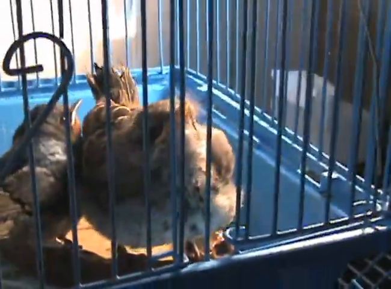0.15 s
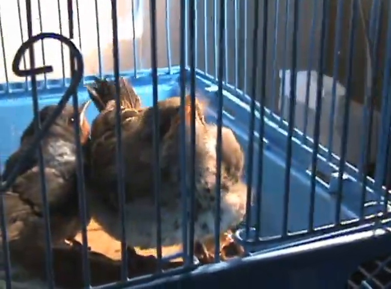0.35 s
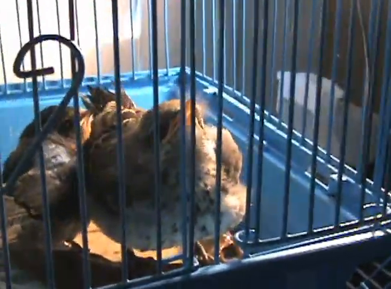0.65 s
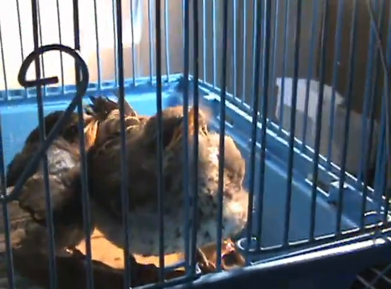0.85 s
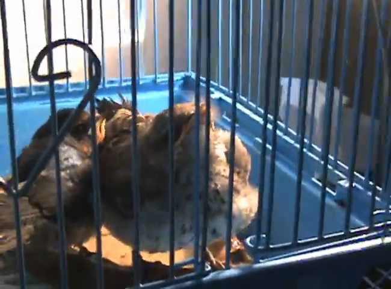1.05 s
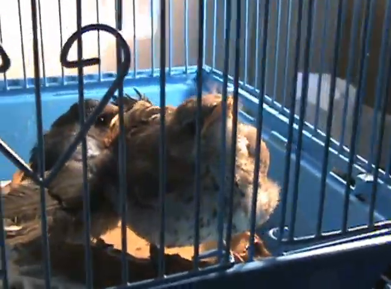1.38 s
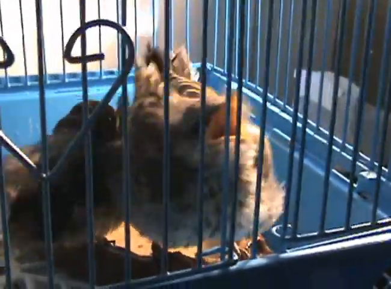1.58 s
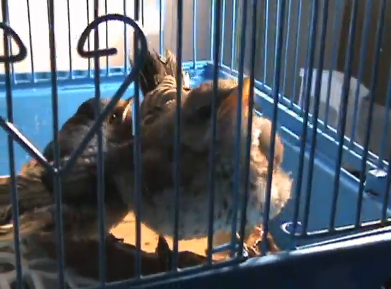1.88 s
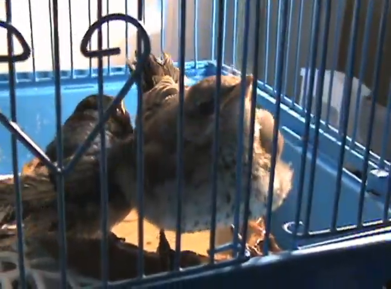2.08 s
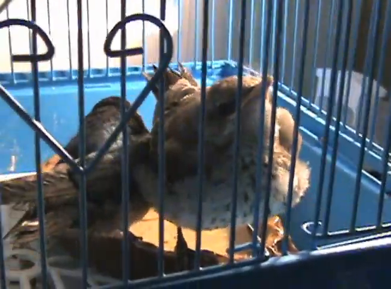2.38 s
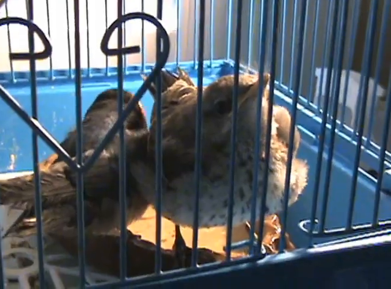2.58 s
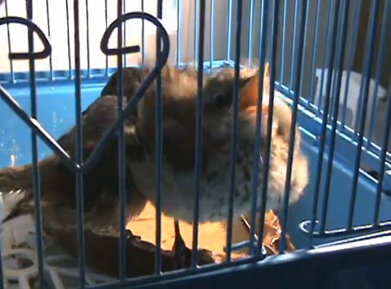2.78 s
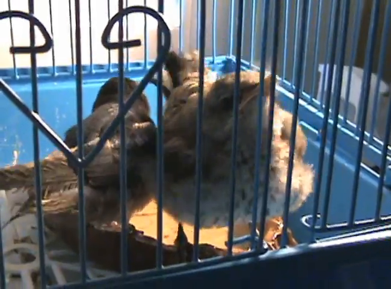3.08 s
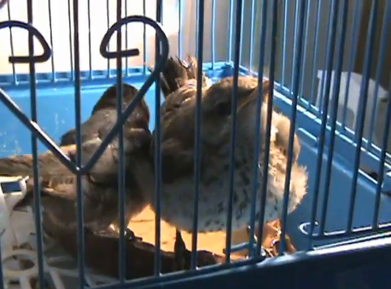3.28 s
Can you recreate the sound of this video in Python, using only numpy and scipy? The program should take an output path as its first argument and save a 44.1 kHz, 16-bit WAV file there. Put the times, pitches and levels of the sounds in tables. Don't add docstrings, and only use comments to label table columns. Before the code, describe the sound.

Two short, shrill chick whistles, over a second apart, with faint rustling and low room hum.

```python
import sys
import numpy as np
from scipy import signal
from scipy.fft import rfft, irfft, next_fast_len
from scipy.io import wavfile
from scipy.ndimage import uniform_filter1d, minimum_filter1d, map_coordinates

SR = 44100
rng = np.random.default_rng(int(sys.argv[2]) if len(sys.argv) > 2 else 0)


def transcribe(u):
    v = np.clip(np.atleast_2d(u).T, -1, 1)
    q = np.round(v * 32767).astype(np.int16)
    wavfile.write(sys.argv[1], SR, q)


def volts_from_decibels(level):
    exponent = np.asarray(level, float) / 20
    return 10 ** exponent


N = 152145


def unit(x):
    return x / np.sqrt(np.mean(x ** 2) + 1e-20)


def along(points, hz):
    point_hz, value = np.transpose(points)
    return np.interp(np.log(hz + 1), np.log(point_hz + 1), value)


def wobble(rate_hz, count):
    knots = rng.standard_normal(int(count * rate_hz / SR) + 4)
    return map_coordinates(knots, [np.arange(count) * rate_hz / SR])


def filtered(x, response):
    size = next_fast_len(x.shape[-1] + 8192)
    spectrum = rfft(x, size) * response(np.fft.rfftfreq(size, 1 / SR))
    return irfft(spectrum, size)[..., :x.shape[-1]]


def noise(count, curve):
    return unit(filtered(rng.standard_normal(count), lambda hz: volts_from_decibels(along(curve, hz))))


# frequency_hz, likeness (1 = the same) [0 to 1]
LIKENESS = [(60, 1.0), (150, 0.94), (380, 0.66), (950, 0.24), (2380, 0.74), (5980, 1), (15000, 0.95)]
# frequency_hz, lead_rad
LEFT_LEAD = [(40, .05), (90, .2), (200, 0.3), (430, .8), (860, 1.3), (1640, .5), (3270, 0.05), (15600, .03)]


def spread(pair, gain):
    def shares(hz):
        angle = np.arccos(np.clip(along(LIKENESS, hz), -1, 1)) / 2
        return gain(hz) * [np.cos(angle), np.sin(angle)]

    mid, side = filtered(pair, shares)
    stereo = np.array([mid + side, mid - side])
    return unit(filtered(stereo, lambda hz: np.exp(.5j * along(LEFT_LEAD, hz) * [[1], [-1]])))


def add(track, start_s, x):
    start = round(start_s * SR)
    part = track[..., start:start + x.shape[-1]]
    part += x[..., :part.shape[-1]]


def edges(count):
    fade_s = 0.00066
    t = np.arange(count) / SR
    return np.clip(np.minimum(t, t[::-1]) / fade_s, 0, 1)


# start_s, pitch_hz, level_db, quarters_db, eighths_or_second_voice_db, turbulence_db
CALLS = [
    [(1.614, 7262, -22, -38, -60.5, -18), (1.624, 7207, -11, -39, -49.5, -19),
     (1.642, 6878, -14.5, -36.5, -50, -22), (1.68, 6804, -10, -27.5, -62, -29.5),
     (1.712, 6813, -4.5, -36, -24.5, -47), (1.735, 6703, -9, -27, -63, -35.5),
     (1.8, 6750, -4.5, -30, -41.5, -31), (1.83, 6630, -8.5, -27.5, -53.5, -25.5),
     (1.843, 6363, -29, -31, -54.5, -18.5)],
    [(2.913, 7374, -21, -54, -58, -16.5), (2.922, 7240, -12, -62, -46, -19),
     (2.945, 6876, -14, -46, -23.5, -24), (2.965, 6725, -10, -49.5, -34, -22),
     (3.02, 6704, -10, -62, -29.5, -26), (3.062, 6644, -9, -60, -30, -46),
     (3.095, 6648, -6.5, -55, -36, -21.5), (3.126, 6497, -9, -67, -59, -39.5),
     (3.137, 6516, -17.5, -60.5, -72, -47)],
]
OCTAVE_DB = [-44.5, -32]
# start_s, from_hz, to_hz, level_db
CHIPS = [
    (1.608, 6375, 7387, -9.5),
    (2.905, 6480, 7770, -15),
]


def fledgling():
    chip_s, rise_share = 0.008, .65
    rasp_db = -16
    voice = np.zeros(N)
    u = np.linspace(0, 1, round(chip_s * SR))
    count = len(u)
    for rows, octave_db, second, chip in zip(CALLS, OCTAVE_DB, [eighths, weak_side], CHIPS):
        start_s, from_hz, to_hz, level_db = chip
        pitch_hz = from_hz + (to_hz - from_hz) * np.minimum(u / rise_share, 1)
        sweep = np.sin(2 * np.pi * np.cumsum(pitch_hz) / SR)
        rasp = 1 + volts_from_decibels(rasp_db) * wobble(3000, count) + volts_from_decibels(rasp_db - 9.5) * wobble(17000, count)
        level = volts_from_decibels(level_db - u + 1.7 * wobble(440, count))
        add(voice, start_s, level * edges(count) * rasp * sweep)
        add(voice, rows[0][0], whistle(rows, octave_db, second))
    return voice


# frequency_hz, level_db
ROUGH_COLOUR = [(2000, -15.5), (2700, -3), (6700, 8), (7600, -3.5), (9500, 3), (10800, -12), (12500, -5),
                (15300, -12)]


def whistle(rows, octave_db, second):
    close_db = 3.5
    start_s, *columns = np.transpose(rows)
    t = np.arange(start_s[0], start_s[-1], 1 / SR)
    pitch_hz, level_db, quarters_db, second_db, rough_db = [np.interp(t, start_s, c) for c in columns]
    phase = 2 * np.pi * np.cumsum(pitch_hz) / SR
    count = len(t)

    extra = volts_from_decibels(quarters_db) * quarters(phase) + volts_from_decibels(second_db) * second(phase)
    extra += volts_from_decibels(rough_db + 1.2 * wobble(160, count)) * turbulence(phase)

    high_khz = np.maximum(pitch_hz - 6850, 0) / 1000
    octave = volts_from_decibels(octave_db - 14 * high_khz + 2.5 * wobble(40, count))
    flutter = volts_from_decibels(.5 * wobble(140, count))
    tone = flutter * np.sin(phase) + octave * np.sin(2 * phase + 0.45 * wobble(200, count))

    mouth = tone + breath(rough_db) + filtered(extra, lambda hz: volts_from_decibels(along(ROUGH_COLOUR, hz)))
    return np.sqrt(2) * volts_from_decibels(level_db + close_db) * edges(count) * mouth


def subharmonics(phase, table, blur_hz, blur_rad):
    count = len(phase)
    total = np.zeros(count)
    for times, level_db in table:
        level = volts_from_decibels(level_db + 3.3 * wobble(blur_hz / 4, count) + 4.4 * wobble(30, count))
        total += level * np.sin(times * phase + blur_rad * wobble(blur_hz, count))
    return total


# quarters [count], level_db
QUARTERS = [(1, -4.5), (2, -9), (3, -1.5), (5, -1.5), (6, -8.5), (7, -6.5), (8, -7.5), (9, -8)]


def quarters(phase):
    return subharmonics(phase / 4, QUARTERS, blur_hz=450, blur_rad=.85)


# eighths [count], level_db
EIGHTHS = [(1, 9), (3, -4), (5, -20), (7, -4.5), (9, 10.5), (11, -16.5), (15, -15.5)]


def eighths(phase):
    return subharmonics(phase / 8, EIGHTHS, blur_hz=60, blur_rad=.3)


# times_pitch [ratio], times_gap [ratio], level_db
VOICE_MIX = [(1, -1, -3), (.2, 0.91, -10.5), (1.8, -0.2, -2), (1, -1.6, -9.5), (2.2, -.5, -2),
             (.55, -1.3, -1.5)]


def weak_side(phase):
    from_hz, to_hz = 1050, 2800
    blur_hz, blur_rad = 1000, 1.3
    count = len(phase)
    gap = 2 * np.pi * np.cumsum(np.linspace(from_hz, to_hz, count)) / SR
    gap += blur_rad * wobble(blur_hz, count)
    total = np.zeros(count)
    for times_pitch, times_gap, level_db in VOICE_MIX:
        level = volts_from_decibels(level_db + 3 * wobble(120, count))
        total += level * np.sin(times_pitch * phase + times_gap * gap)
    return total


# distance_from_pitch_hz, level_db
SHAKE = [(30, -10), (200, -2), (450, -3.5), (1200, -7), (2500, -24.5), (5000, -14), (9000, -30)]


def turbulence(phase):
    octave_db, mouth_db = -9, -12.5
    mouth_times = 1.4
    shake_a, shake_b = [noise(len(phase), SHAKE) for _ in "ab"]
    around_pitch = shake_a * np.sin(phase) + shake_b * np.cos(phase)
    around_octave = volts_from_decibels(octave_db) * shake_b * np.sin(2 * phase)
    around_mouth = volts_from_decibels(mouth_db) * shake_a * np.sin(mouth_times * phase)
    return around_pitch + around_octave + around_mouth


# frequency_hz, level_db
PUFF = [(120, -18.5), (300, 3), (900, 0), (1800, -10), (3000, -29.5)]


def breath(rough_db):
    return volts_from_decibels(-34.5) * noise(len(rough_db), PUFF) * volts_from_decibels(rough_db / 2)


# frequency_hz, time_to_fall_60_db_s
ROOM = [(2000, .45), (5200, 0.6), (6700, 0.42), (8500, .36), (13500, 0.33)]


def room(x):
    wide = 0.89
    hz, t, grid = signal.stft(rng.standard_normal((2, SR // 2)), SR, nperseg=256)
    decay = volts_from_decibels(-60 * t / along(ROOM, hz)[:, None])
    mid, side = signal.istft(grid * decay, SR, nperseg=256)[1]
    tail = np.array([mid + wide * side, mid - wide * side]) / np.linalg.norm(mid)
    delayed = np.pad(x, (300, 0))[None]
    return signal.fftconvolve(delayed, tail, axes=1)[:, :N]


# frequency_hz, level_db [dB per Hz]
FEATHER = [(880, -42.5), (1500, -12), (2680, -6), (3020, -2.5), (3400, -1), (6450, 0), (9370, -2.5),
           (15800, -31.5)]
# start_s, level_db
RUSTLE = [(0, -65.5), (.11, -67), (0.148, -57), (.28, -60), (.32, -61.5), (.46, -67), (.49, -73),
          (.62, -64.5), (.74, -71), (.85, -80.5), (.92, -63.5), (.98, -74.5), (1.461, -63.5),
          (1.599, -66.5), (2.099, -67), (2.5, -72.5), (2.66, -62), (2.8, -73)]


def rustle():
    grains_per_s, rustle_db = 9000, 5
    s, level_db = np.transpose(RUSTLE)
    stirring_db = np.interp(np.arange(N) / SR, s, level_db)
    grains = (rng.random((2, N)) < grains_per_s / SR) * rng.standard_normal((2, N))
    level = volts_from_decibels(stirring_db + rustle_db + 1.6 * wobble(30, N))
    return level * spread(grains, lambda hz: volts_from_decibels(along(FEATHER, hz)))


# start_s, peak_db, length_s, brightness_db_per_octave
SCRATCHES = [(0.04, -44.5, 0.017, -4), (0.203, -45, 0.06, -8), (0.282, -41.5, 0.0083, -2),
             (0.32, -44, 0.0093, -5), (0.374, -45, 0.017, -4), (0.419, -50.5, 0.023, -1),
             (0.506, -46, 0.011, -3), (0.556, -42.5, 0.012, -6), (0.59, -52.5, 0.033, -7),
             (0.877, -52.5, 0.0097, 4), (1.104, -48, 0.01, -4.5), (1.15, -45.5, 0.0083, 10.5),
             (1.22, -51, 0.027, -4), (2.731, -48, 0.00605, 1), (3.092, -20.5, 0.032, 4.5),
             (3.192, -32, 0.0084, -4.5), (3.206, -23, 0.0032, 1), (3.207, -38, 0.026, -3)]


def scratches():
    scratch_db = -1.5
    x = np.zeros((2, N))
    t = np.arange(SR // 10) / SR
    for start_s, peak_db, length_s, tilt_db in SCRATCHES:
        def colour(hz):
            return volts_from_decibels(along(FEATHER, hz) + tilt_db * np.log2((hz + 50) / 5000))

        scrape = spread(rng.standard_normal((2, len(t))), colour)
        w = t / max(length_s, .002)
        swell = 4 * w * np.exp(-2.5 * w)
        add(x, start_s - .003, volts_from_decibels(peak_db + scratch_db) * swell * scrape)
    return x


# frequency_hz, level_db [dB per Hz]
AIR = [(20, -52.5), (36, -20.5), (90, -6.5), (500, -15.5), (900, -16), (8000, -37), (12500, -42.5),
       (15800, -47)]


def hiss():
    steady = spread(rng.standard_normal((2, N)), lambda hz: volts_from_decibels(along(AIR, hz)))
    return volts_from_decibels(-52 + 1.2 * wobble(7.5, N)) * steady


# pitch_hz, width_hz, level_db
HUM = [(42.4, 9.4, 1.5), (68.6, 32, -3.5), (131.7, 24, -1.5), (282.7, 33.7, -6), (430.6, 46, -13)]


def hum():
    def bumps(hz):
        power = 0
        for pitch_hz, width_hz, level_db in HUM:
            power = power + volts_from_decibels(2 * level_db) / (1 + ((hz - pitch_hz) / (width_hz / 2)) ** 4)
        return np.sqrt(power)

    return volts_from_decibels(-52 + 0.81 * wobble(1.6, N)) * spread(rng.standard_normal((2, N)), bumps)


def scene():
    top_hz, top_order = 15300, 24
    port_turn_rad = .08
    pan_db, room_db = .25, -20.5
    bird = filtered(fledgling(), lambda hz: 1 / (1 + (hz / top_hz) ** top_order))
    first_call = np.arange(N) < 2.5 * SR
    wet = room(bird * first_call) + room(bird * ~first_call)
    turn = np.exp(1j * port_turn_rad * np.array([[1], [-1]]))
    direct = filtered(bird, lambda hz: turn + 0 * hz) * volts_from_decibels([[pan_db], [-pan_db]])
    return direct + volts_from_decibels(room_db) * wet + rustle() + scratches() + hiss() + hum()


def masked(x):
    above_db, above_db_per_band = 29.5, 2.2
    below_db, below_db_per_band = 29, 5
    soft_db = 1.2
    grid = signal.stft(x, nperseg=2048)[2]
    bands = grid[:, :1024].reshape(2, 64, 16, -1)
    level = 10 * np.log10((np.abs(bands) ** 2).sum((0, 2)) + 1e-20)
    band = np.arange(len(level))[:, None]

    up = above_db_per_band * band
    hidden_above = np.maximum.accumulate(level + up, axis=0) - up - above_db
    down = below_db_per_band * band
    hidden_below = (np.maximum.accumulate(level[::-1] + down, axis=0) - down)[::-1] - below_db
    hidden = np.maximum(hidden_above, hidden_below)

    keep = np.repeat(.5 + .5 * np.tanh((level - hidden) / soft_db), 16, axis=0)
    keep = np.vstack([keep, keep[-1:]])
    return signal.istft(grid * keep, nperseg=2048)[1][:, :N]


def low_pass(x):
    return signal.sosfilt(signal.butter(12, 15990, fs=SR, output="sos"), x)


def record(dry):
    ceiling_db, firmness = -3.6, .8
    hold_s, glide_s = .007, .006
    peak = np.abs(dry).max(0) + 1e-9
    need = np.minimum(1, volts_from_decibels(ceiling_db) / peak) ** firmness
    held = minimum_filter1d(need, round(hold_s * SR))
    gain = uniform_filter1d(held, round(glide_s * SR))
    mix = masked(dry * gain)
    return low_pass(mix)


dry = scene()
out = record(dry)
transcribe(out)
```